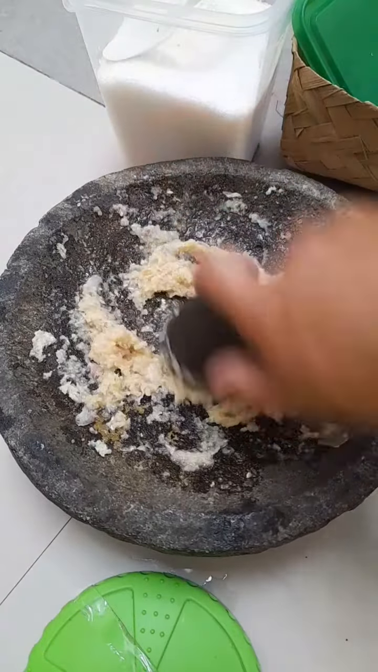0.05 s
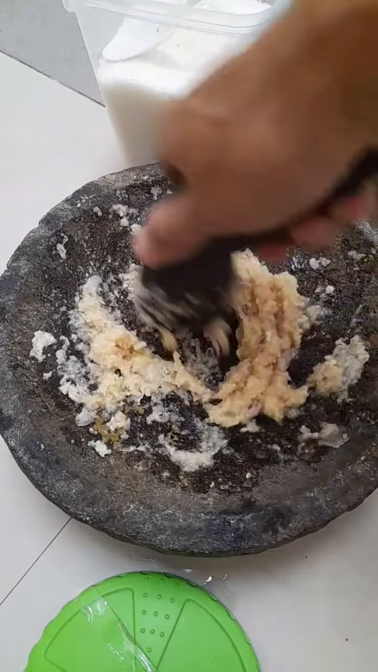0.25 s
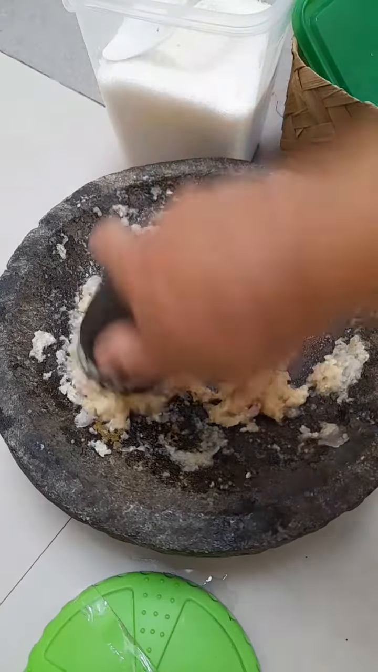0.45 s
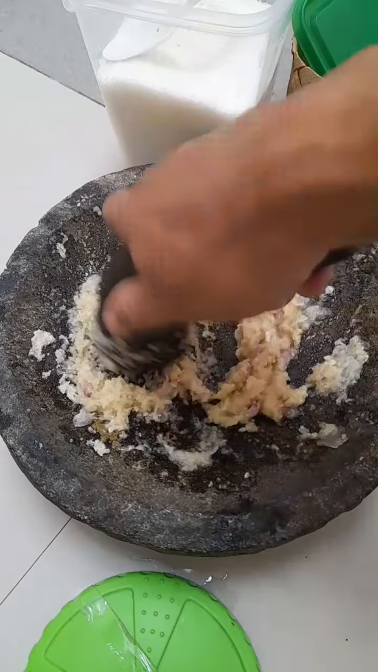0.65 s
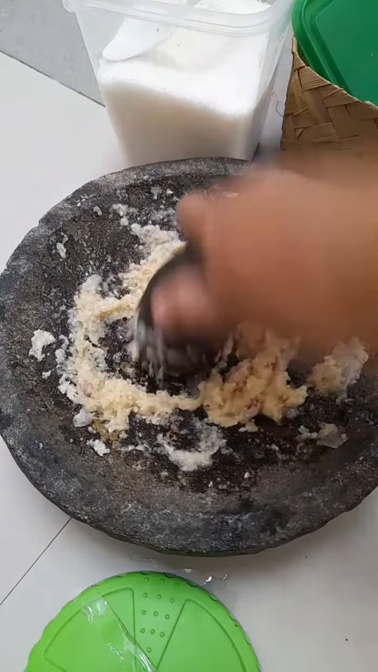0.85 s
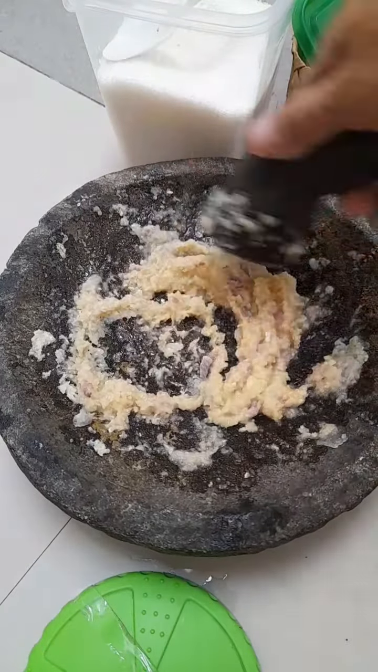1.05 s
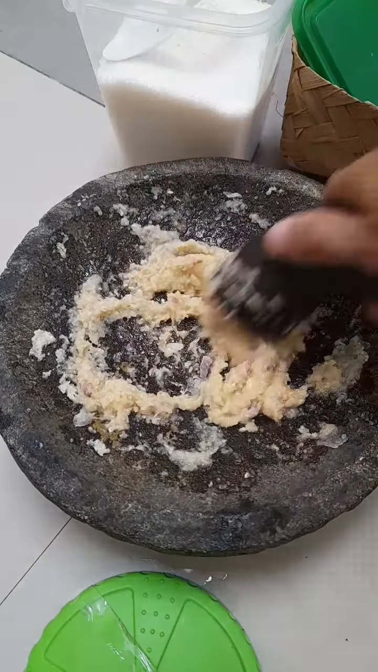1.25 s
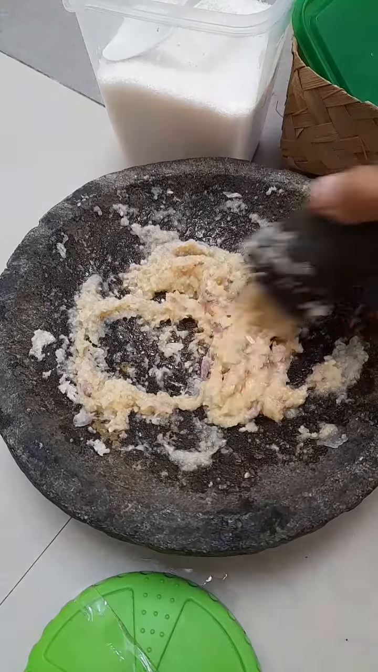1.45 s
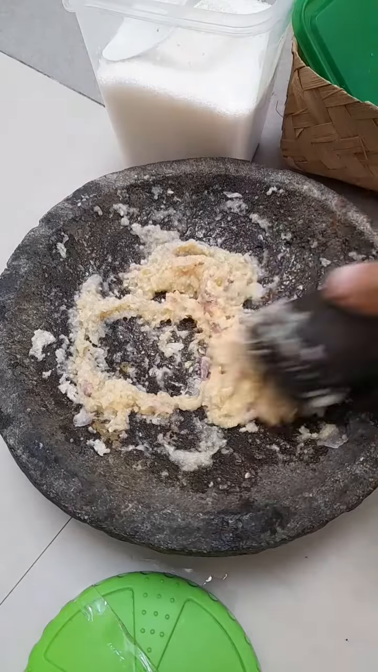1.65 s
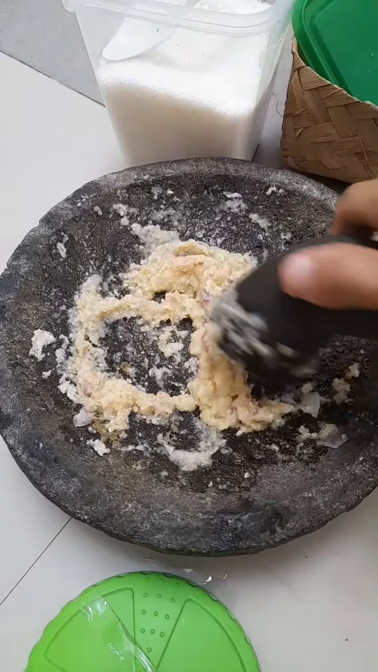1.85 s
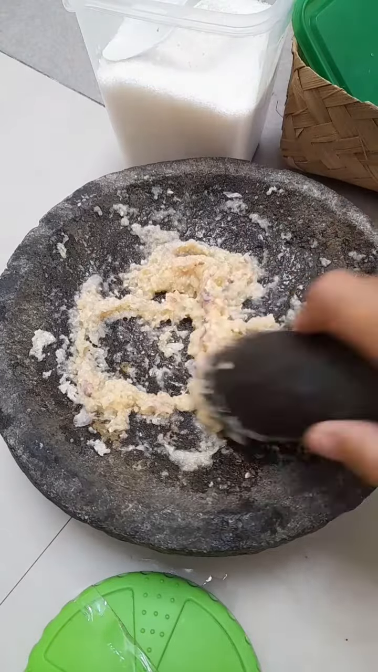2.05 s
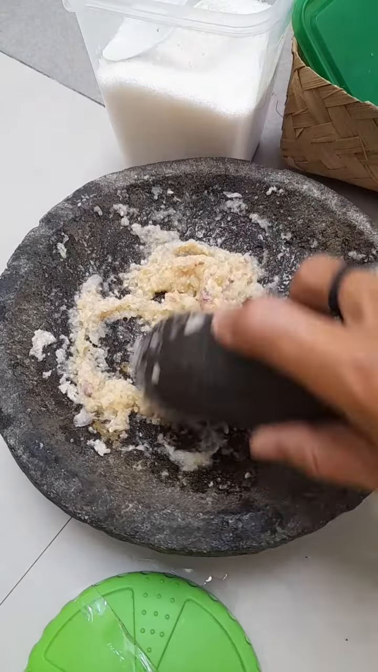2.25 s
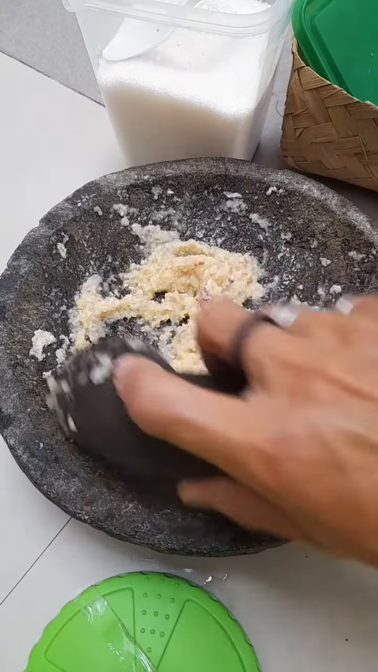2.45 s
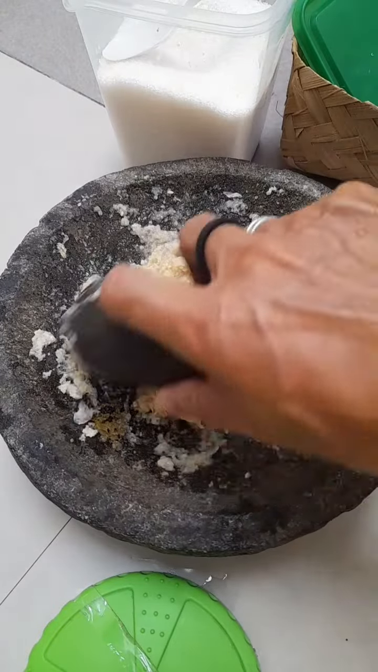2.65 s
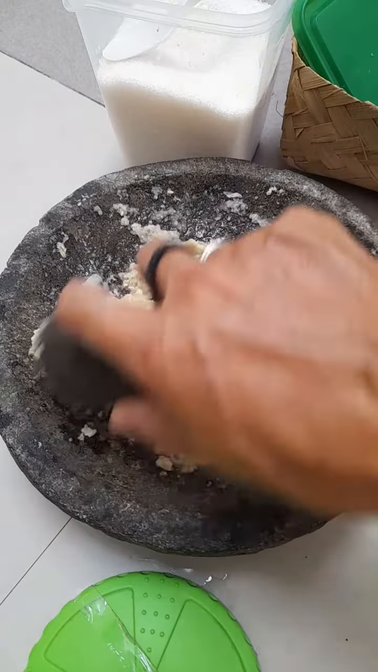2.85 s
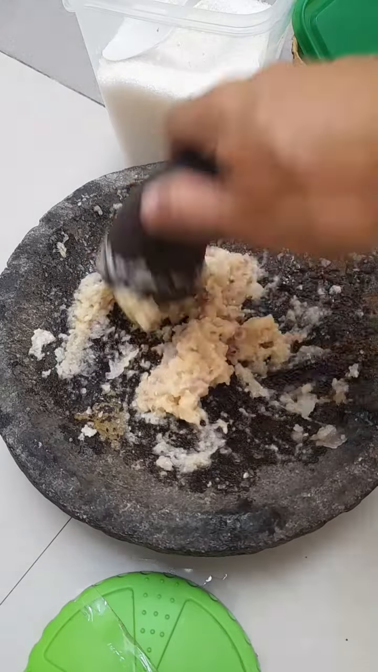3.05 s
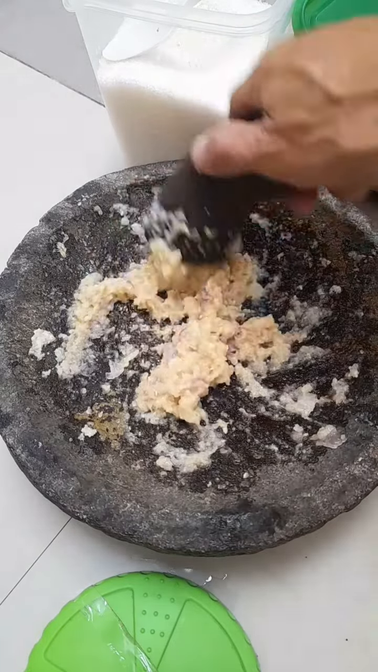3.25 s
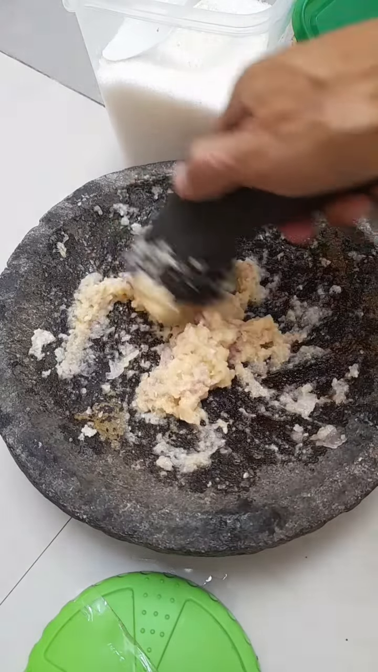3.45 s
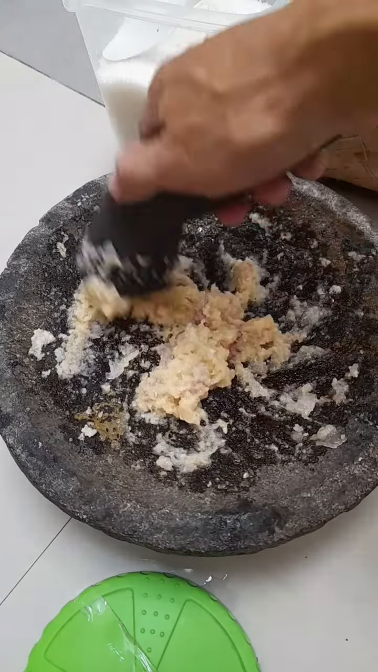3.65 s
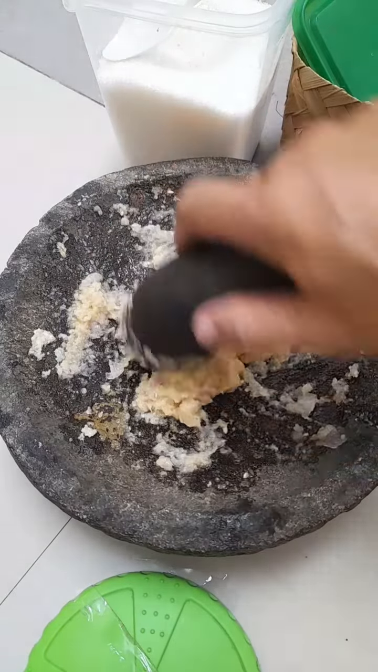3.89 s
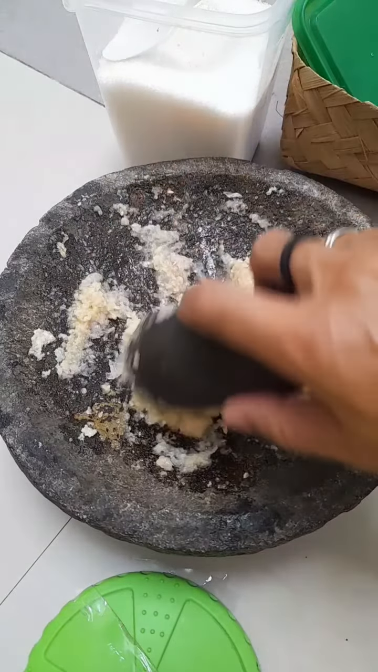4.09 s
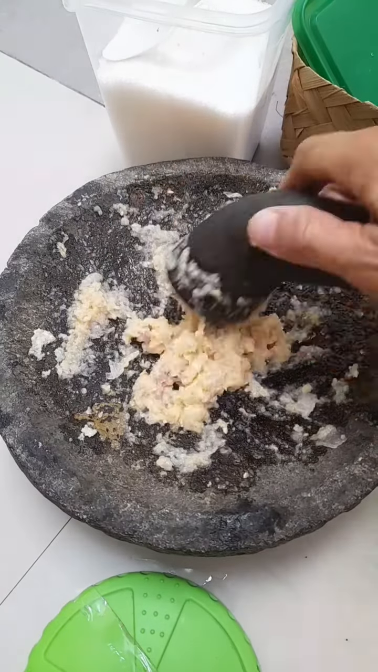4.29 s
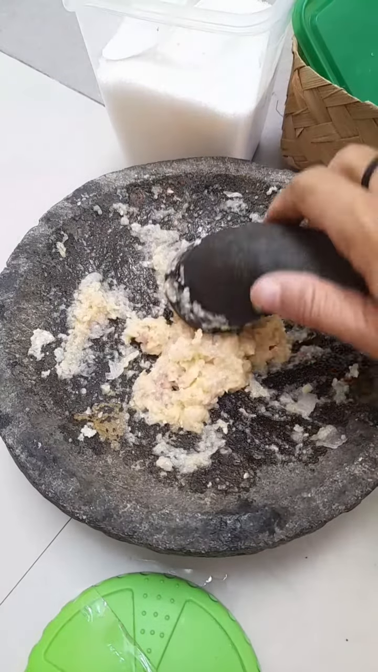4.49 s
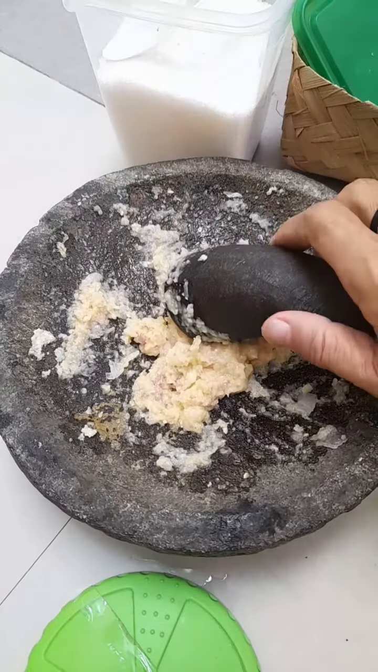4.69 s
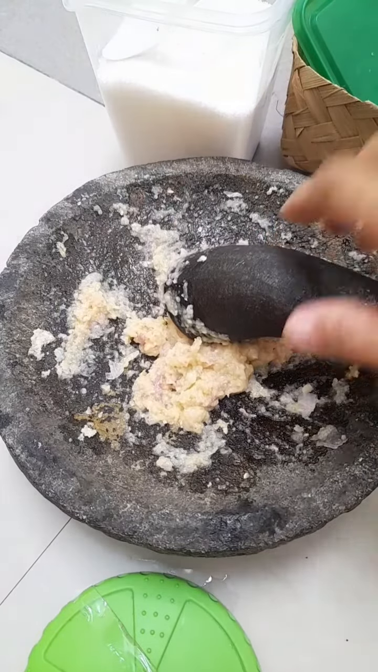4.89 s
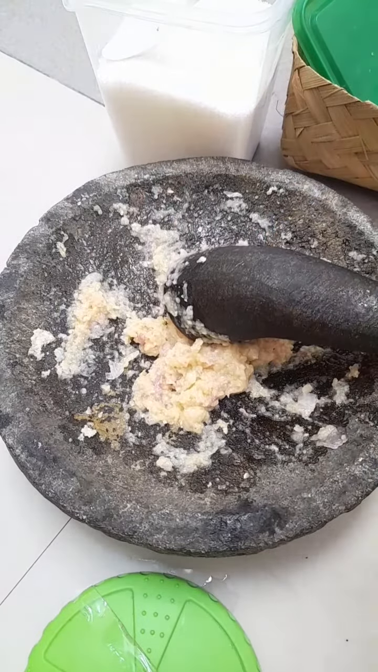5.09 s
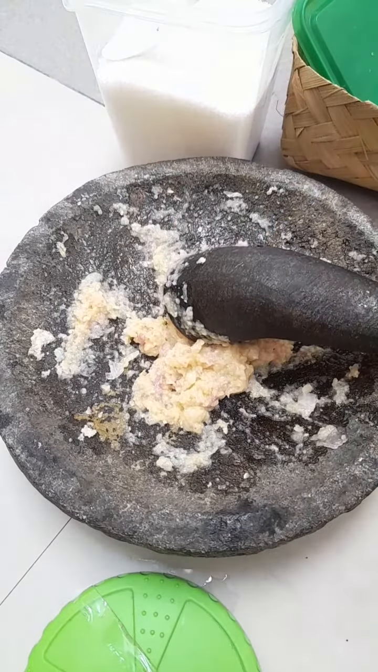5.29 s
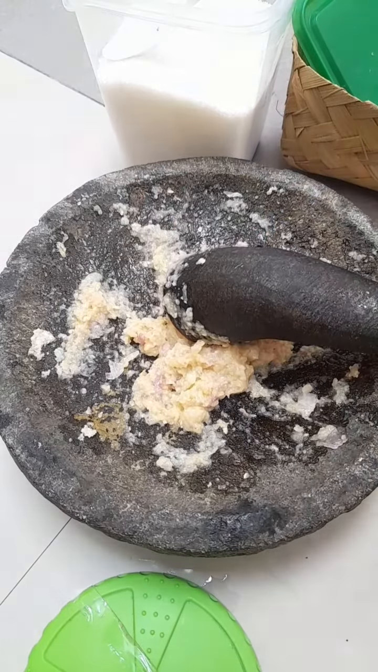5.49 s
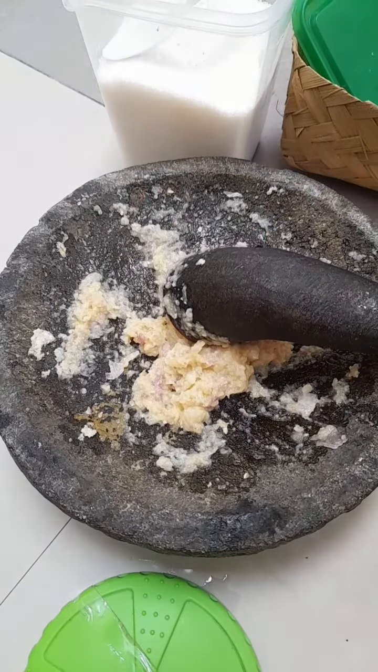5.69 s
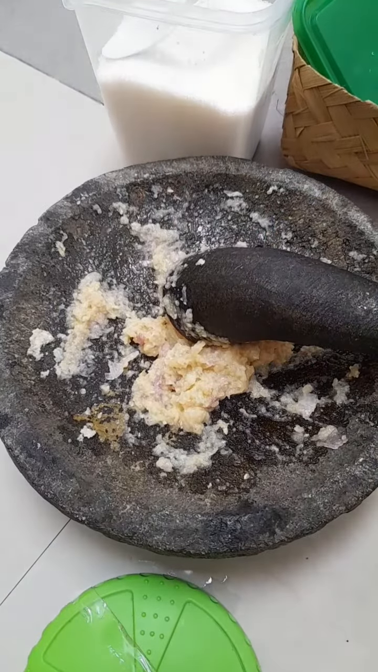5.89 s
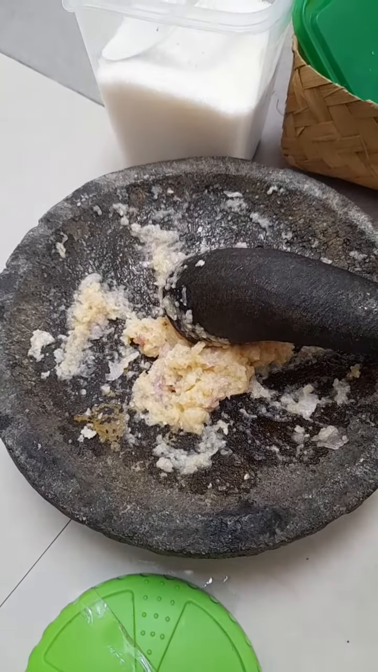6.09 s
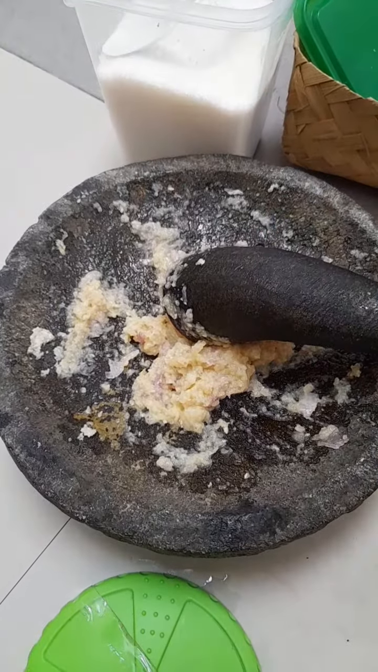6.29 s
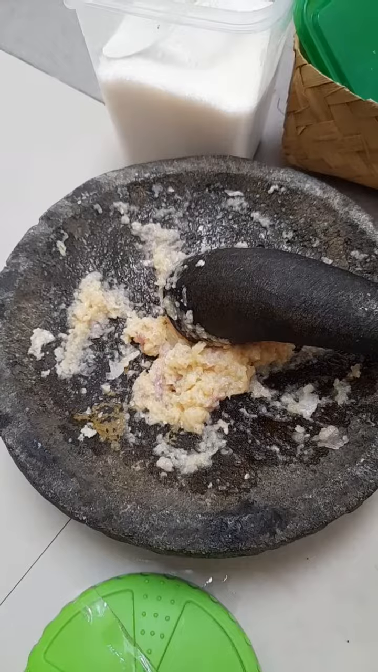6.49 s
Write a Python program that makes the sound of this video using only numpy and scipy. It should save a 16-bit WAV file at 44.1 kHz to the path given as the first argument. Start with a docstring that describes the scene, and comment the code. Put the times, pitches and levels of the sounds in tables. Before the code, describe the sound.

A close microphone in a small, hard kitchen hears a stone pestle working wet paste in a flat stone mortar, over a faint steady low rumble. From 0 to 1 second it is mostly soft: moist smears, dull gritty rubbing and a cluster of crisp sticky ticks around 0.6 to 0.9. At 1.2 a loud, bright stone clack lands with a short scrape. Around 1.55 to 1.75 come lighter rapid knocks and a rough drag. Another strong hollow knock hits at 2.0, scraping on, then medium knocks and grinding at 2.5 and 2.8. Softer taps follow near 3.3, and a broader wet, hissing smear with grit at 3.5 to 3.7. Small sticky ticks sound until 4.3. At 4.63 a sharp double clack sets the pestle down, with a brief room tail. A faint hand slide near 5 fades, leaving only quiet rumble until the end.

```python
"""A stone pestle knocks, scrapes and gathers wet spice paste in a flat stone mortar on a tiled kitchen floor.
Blows and random grit impacts excite decaying modes of the floor slab, the bowl with its rim and face, and the pestle.
The paste is shaped noise: a hiss that swells as it is smeared, and short bursts that tick as it lets go.
A hard room answers by convolution with sparse decaying taps, over a low steady rumble of filtered noise."""
import sys
import numpy as np
from scipy import signal
from scipy.io import wavfile
from scipy.ndimage import uniform_filter1d

SR = 44100
rng = np.random.default_rng(int(sys.argv[2]) if len(sys.argv) > 2 else 0)


def transcribe(signal):
    """Save signal, clipped to [-1, 1], as a 16-bit WAV file at the path in sys.argv[1]."""
    frames = np.atleast_2d(signal).T
    limited = np.clip(frames, -1, 1)
    pcm = np.round(limited * 32767).astype(np.int16)
    wavfile.write(sys.argv[1], SR, pcm)


N = 287973  # samples in the scene


def gain_of(db):
    """Decibel law: 20 dB is a factor of ten in amplitude."""
    return 10 ** (np.asarray(db) / 20)


def evened(x):
    """Normalisation by root mean square: scales the signal to rms 1."""
    return x / np.sqrt(np.mean(x ** 2) + 1e-20)


def read(points, hz):
    """Interpolation of a spectrum, linear along a log-frequency axis."""
    point_hz, value = np.transpose(points)
    return np.interp(np.log(hz + 1), np.log(point_hz + 1), value)


def sides(db):
    """Interaural level difference: half is added on the left and half taken on the right."""
    return gain_of(np.array([db / 2, -db / 2]))


SWELL_DB = 30  # level climbed in a rise time and lost in a fall time


def swells(peak_s, rise_s, hold_s, fall_s):
    """Exponential envelopes, one row each: level climbs linearly in dB, holds, then falls."""
    t = np.arange(0, N + 64, 64)[:, None] / SR  # one value per 64 samples
    before = (peak_s - t) / np.abs(rise_s)
    after = (t - peak_s - hold_s) / np.abs(fall_s)
    below = np.maximum(before, after)
    return gain_of(-SWELL_DB * np.maximum(below, 0)).T


def summed(gains, db):
    """Incoherent addition: swells add by power at their levels, then spread over all samples."""
    power = gain_of(2 * np.asarray(db)) @ gains ** 2
    total = np.sqrt(power)
    return np.interp(np.arange(N), np.arange(len(total)) * 64, total)


def hiss(shape, same, lead, size):
    """Random-phase synthesis: two partly coherent channels of noise with magnitude shape(Hz, s)."""
    hop = size // 4
    frames, hz = N // hop + 5, np.fft.rfftfreq(size, 1 / SR)
    a, b, c, d = rng.standard_normal((frames, len(hz), 4)).T
    likeness = np.clip(read(same, hz), -1, 1)[:, None]
    lag = np.exp(-1j * read(lead, hz))[:, None]
    left = a + 1j * b
    right = likeness * left * lag + np.sqrt(1 - likeness ** 2) * (c + 1j * d)
    spectra = np.array([left, right]) * shape(hz[:, None], np.arange(frames) * hop / SR)
    return signal.istft(spectra, nperseg=size, noverlap=size - hop)[1][:, :N]


# Rumble colour. Each row: frequency in Hz, relative level in dB per Hz.
RUMBLE_COLOUR = [(21, -48.5), (35, -13), (82, -10), (129, -9), (171, -10), (239, -18), (258, -22.5),
                 (309, -23), (389, -27.5), (800, -50), (1300, -58), (6690, -64), (10600, -61),
                 (14500, -64.5), (16000, -71.5)]
# Rumble coherence. Each row: frequency in Hz, left-right likeness from -1 to 1.
RUMBLE_LIKENESS = [(60, 1), (200, 0.98), (330, 0.5), (550, -0.01), (1650, 0.63), (4970, 0.072),
                   (15000, 0.3)]
# Rumble balance. Each row: frequency in Hz, left-right level difference in dB.
RUMBLE_LEAN = [(60, -0.1), (240, -4), (950, -0.5), (3770, -2), (15000, -1.5)]
RUMBLE_DB = -44  # rms level


def rumble():
    """Stationary coloured noise: low sound from outside the room, in drifting patches."""
    def shape(hz, t):
        """Slow modulation: patches smoothed over frequency and time wander about the colour."""
        patches = rng.standard_normal((len(t), len(hz))).T
        patches = uniform_filter1d(patches, 3, 0)
        patches = evened(uniform_filter1d(patches, 8, 1))
        lean = sides(read(RUMBLE_LEAN, hz))
        return lean * gain_of(read(RUMBLE_COLOUR, hz) + 0.5 * patches)

    noise = hiss(shape, RUMBLE_LIKENESS, [(60, 0), (15000, 0.02)], size=2048)
    return gain_of(RUMBLE_DB) * evened(noise)


# Sticky paste letting go. Each row: time in seconds, peak level in dB, centre in Hz.
TICKS = [(0.034, -40.5, 7000), (0.048, -46, 7000), (0.163, -44, 3860), (0.188, -37, 8700),
         (0.2726, -43.5, 6800), (0.312, -56, 10100), (0.526, -58, 4600), (0.6316, -29, 7440),
         (0.6455, -31.5, 3600), (0.744, -28, 4500), (0.75, -32, 13300), (0.7888, -38, 7590),
         (0.8454, -38.5, 5650), (0.856, -34, 12500), (0.8813, -36, 12710), (0.9082, -27.5, 4750),
         (0.936, -34.5, 12300), (1.33, -41, 7000), (1.385, -42, 8700), (1.494, -47, 9180),
         (2.1206, -41.5, 3670), (2.2328, -39.5, 11600), (2.2668, -39.5, 13000), (2.6445, -36.5, 12700),
         (2.6834, -43.5, 11100), (3.033, -38.5, 11170), (3.3947, -38, 6950), (3.729, -32.5, 4770),
         (3.8204, -41, 9190), (3.8508, -38, 4850), (4.0044, -51.5, 10700), (4.1445, -50.5, 14300),
         (4.1685, -44.5, 7200), (4.1941, -31.5, 4430), (4.219, -50, 1650), (4.232, -41, 4640),
         (4.2786, -47.5, 14300), (4.289, -48.5, 1750)]
# Paste squeezed and smeared, then the hand sliding off the stone. Each row: peak time in seconds,
# rise in seconds, hold in seconds, fall in seconds, level in dB, treble tilt in dB per octave.
SMEARS = [(0.114, 0.69, .003, 0.02, -51.5, -7.5), (0.184, 0.17, .003, .16, -52.5, -3.5),
          (0.27, 0.044, .003, .22, -69.5, -1), (0.46, 0.015, .15, 0.11, -63.5, -3),
          (0.65, .05, .07, 0.085, -52, -1), (0.746, .06, .003, 0.12, -44, -2.5),
          (0.856, .06, .003, .165, -45, -1.5), (1.19, 0.041, .22, 0.147, -57, -3.5),
          (1.546, 0.026, .06, 0.19, -54.5, -6.5), (1.652, 0.16, .04, .22, -50.5, -2),
          (2.01, .008, .1, .1, -65.5, -1.6), (2.12, .012, .003, 0.32, -51.5, 0.5),
          (2.232, .008, .003, .2, -53, -6.5), (2.56, 0.38, .003, 0.22, -53.5, -4),
          (2.644, 0.008, .003, .04, -52.5, 0.5), (2.81, 0.0086, .003, .11, -57, -1.5),
          (2.946, 0.17, .003, 0.15, -52.5, -2), (3.036, .05, .003, .015, -50, -0.5),
          (3.05, .012, .003, 0.063, -61, -1.4), (3.244, .009, .14, .05, -59, -3),
          (3.43, .07, .04, .1, -50.5, -4.5), (3.566, 0.25, 0.074, 0.18, -36.5, -3.5),
          (3.82, .015, .06, .3, -60, -5), (4.192, .03, .003, 0.27, -54.5, -6.5),
          (4.462, 0.095, .003, .3, -67.5, -3.4), (4.7, .03, .18, .1, -69.5, -7.5),
          (4.986, 0.31, .02, .16, -58, -6), (5.342, .13, .003, .25, -69.5, 6.5)]
# Paste hiss colour. Each row: frequency in Hz, relative level in dB per Hz.
SMEAR_COLOUR = [(900, -36), (1600, -10.5), (3000, -9.5), (4500, -6.5), (7000, -4.5), (10000, -8),
                (13000, -1), (15500, -6.5)]
# Paste hiss coherence. Each row: frequency in Hz, left-right likeness from -1 to 1.
SMEAR_LIKENESS = [(1000, 1), (5000, 0.88), (15000, 1)]
# Paste hiss phase. Each row: frequency in Hz, radians by which the left leads.
SMEAR_LEAD = [(1000, 2), (8000, 1.69), (15000, 0.8)]
SQUELCH_DB, SQUELCH_S = -11.5, 0.03  # the hiss jumps after each tick, against its peak, and falls


def smear():
    """Modulated broadband noise: a dense wet hiss whose tilt is the power-weighted mean of its swells."""
    peak_s, rise_s, hold_s, fall_s, db, tilt_db = np.transpose(SMEARS)
    squeeze = swells(peak_s, rise_s, hold_s, fall_s)
    power = (gain_of(db)[:, None] * squeeze) ** 2 + 1e-30
    tilt_now = tilt_db @ power / power.sum(0)
    tick_s, tick_db, _ = np.transpose(TICKS)
    squelch = swells(tick_s, 0.0018, 0, SQUELCH_S)
    level = np.hypot(summed(squeeze, db), summed(squelch, tick_db + SQUELCH_DB))

    def shape(hz, t):
        """Spectral tilt about 8 kHz, with a flicker in level common to all frequencies."""
        flicker = evened(uniform_filter1d(rng.standard_normal(len(t)), 4))
        octaves = np.clip(np.log2((hz + 1) / 8000), -2.5, 1)
        tilt = np.interp(t, np.linspace(0, N / SR, len(tilt_now)), tilt_now) * octaves
        return gain_of(read(SMEAR_COLOUR, hz) + tilt + 0.84 * flicker)

    return level * evened(hiss(shape, SMEAR_LIKENESS, SMEAR_LEAD, size=256))


# Modes of the five ringing bodies. Each row: frequency in Hz, relative level in dB, t60 in seconds
# before the share of ring time, left-right difference in dB, radians by which the left leads.
BOWL = [(604, -6, 0.0057, 0.67, 0.42), (617.7, 9.5, 0.025, 0.67, 0.62), (662, 4, 0.024, 1.5, 1.1),
        (717.6, 6, 0.028, 2, 0.66), (809, -7, 0.11, 0.73, 2.4), (959.5, -3.5, .05, 18, 0.94),
        (1016, -6.5, 0.059, 3.8, 1)]
PESTLE = [(2012, -7.5, 0.018, -13.5, 0.2), (2175, 5.5, 0.028, -1, 1.4), (2398, -39.5, 0.21, 12.5, 1.3),
          (2500, -9, 0.017, 2.5, 2.8), (2653, -22.5, 0.013, 0, 1.5)]
FACE = [(2910, -0.5, 0.03, 1, 2.1), (3760, -0.5, 0.036, 0.91, 0.94), (4458, 4, 0.032, 0.69, 1.3),
        (4603, -8.5, 0.099, 0.54, 1.2), (4980, 1, 0.042, 0.85, 1.9), (6880, -11.5, 0.04, 0.47, 1.1),
        (3360, -1.5, .01, 0.7, 1.7), (4900, -10, 0.013, 0.7, 4.3), (6200, -17.5, 0.011, 0.7, 1.3),
        (7550, -20, 0.013, 0.7, 1.4), (9430, -12, 0.028, 0.7, 1.2)]
RIM = [(1178, 3, 0.019, 2, 1.8), (1334, 4.5, 0.012, 2.5, 1.6), (1650, -5, 0.01, 2.5, 4),
       (1737, -1, 0.021, 3.3, 1.5)]
SLAB = [(124.5, -16, 0.16, 5.5, 0.12), (157.5, -5, 0.23, 1, .2), (254, 2, 0.054, 2.5, 0.19),
        (305, 4, 0.061, -4.5, 1)]
BODIES = [(BOWL, 0.0012), (PESTLE, 0.0009), (FACE, 0.0004), (RIM, 0.0008), (SLAB, 0.002)]  # contact rise in s
PRESSED, FREE = 0.74, 0.93  # share of ring time left: stones pressed together in paste, and after a blow


def ring(modes, rise_s, share):
    """Modal superposition: a struck body sounds as a sum of decaying sines, two channels, peak 1."""
    t = np.arange(SR // 6) / SR
    out = np.zeros((2, len(t)))
    for hz, db, t60, pan_db, lead in modes:
        decay = gain_of(db - 60 * t / (t60 * share))
        phase = np.array([[lead / 2], [-lead / 2]])
        out += sides(pan_db)[:, None] * decay * np.sin(2 * np.pi * hz * t + phase)
    out = out * (1 - np.exp(-t / rise_s))  # the contact takes a moment to build
    return out / abs(out.mean(0)).max()


# Scrapes of stone on stone. Each row: peak time in seconds, rise in seconds, hold in seconds, fall in
# seconds, grit into the bowl in dB, into the pestle in dB, rasp of the face in dB, into the rim in dB.
SCRAPES = [(0.077, 0.12, 0.045, 0.047, -49, -62.5, -63.5, -58),
           (0.159, 0.037, 0.06, 0.035, -53, -70, -62.5, -60), (0.48, .04, 0.009, 0.18, -66, -73, -85, -74),
           (0.541, .015, 0.037, 0.18, -54, -58.5, -69, -63),
           (0.623, 0.08, 0.065, 0.065, -45.5, -58.5, -58.5, -54),
           (0.726, 0.054, 0.044, 0.12, -47, -62.5, -61, -57),
           (0.852, 0.05, 0.051, 0.02, -51, -69, -60.5, -65),
           (1.204, 0.013, 0.052, 0.16, -33, -33, -57.5, -40),
           (1.547, 0.011, 0.14, .1, -44, -46.5, -58, -60),
           (1.669, .03, 0.046, 0.054, -34.5, -47.5, -61, -50),
           (2.039, 0.026, 0.017, 0.077, -37.5, -28, -73, -33.5),
           (2.086, .03, 0.091, .11, -42, -43, -67, -49),
           (2.424, 0.049, 0.022, 0.25, -35.5, -50.5, -63.5, -58),
           (2.541, 0.09, 0.038, 0.045, -35.5, -50, -58.5, -47.5),
           (2.826, 0.01, 0.0084, 0.028, -41, -66, -76, -55.5),
           (2.86, 0.038, 0.099, 0.077, -51, -57.5, -61.5, -63),
           (3.251, .012, .01, .1, -56.5, -65.5, -66.5, -66),
           (3.306, 0.011, 0.042, 0.047, -42.5, -50.5, -57, -43),
           (3.543, 0.11, 0.079, .05, -47.5, -52.5, -50.5, -52),
           (3.643, 0.036, 0.077, 0.066, -42.5, -48.5, -55.5, -51.5),
           (4.191, 0.015, 0.037, 0.14, -74, -70.5, -73, -71)]
SLIP_DB = 3.0  # spread of the grit level as the stone sticks and slips
SLAB_GRIT_DB = -0.5  # floor share of the grit, against the bowl


def scrapes():
    """Stick-slip friction: a rain of random grit impacts drives the five damped bodies."""
    out = np.zeros((2, N))
    sizes = gain_of(3.1 * np.minimum(rng.exponential(1, N), 4))
    impacts = sizes * (rng.random(N) < 2600 / SR)  # about 2600 a second
    slips = uniform_filter1d(rng.standard_normal(N), 250)
    slips = evened(uniform_filter1d(slips, 250))  # the stone sticks and lets go
    grit = evened(impacts * gain_of(SLIP_DB * slips) * rng.choice([-1., 1.], N))
    peak_s, rise_s, hold_s, fall_s, bowl_db, pestle_db, rasp_db, rim_db = np.transpose(SCRAPES)
    pressure = swells(peak_s, rise_s, hold_s, fall_s)
    levels = [bowl_db, pestle_db, rasp_db, rim_db, bowl_db + SLAB_GRIT_DB]
    for (modes, contact_s), db in zip(BODIES, levels):
        damped = ring(modes, contact_s, PRESSED)
        damped = damped / np.linalg.norm(damped.mean(0))
        force = summed(pressure, db) * grit
        out += signal.oaconvolve(force[None], damped, axes=1)[:, :N]
    return out


def ticks():
    """Transient release: each tick is a wide noise burst tinted at its centre, gone in milliseconds."""
    out, t = np.zeros((2, N + 600)), np.arange(600) / SR
    noises = rng.standard_normal((len(TICKS), 3, len(t)))
    for (s, db, hz), noise in zip(TICKS, noises):
        envelope = (1 - np.exp(-t / 0.00037)) * np.exp(-t / 0.0015)
        burst = (noise[0] + 6.9 * noise[1:]) * envelope  # a little shared, mostly separate per side
        tint = signal.butter(2, [hz * 0.589, min(hz * 1.2, SR * 0.45)], "bandpass", fs=SR)
        burst = signal.lfilter(*tint, burst) + 0.54 * burst * (hz / 8000)
        at = round(s * SR)
        out[:, at:at + len(t)] += gain_of(db) * burst / abs(burst.mean(0)).max()
    return out[:, :N]


# Blows of the pestle. Each row: time in seconds, bowl level in dB, pestle level in dB, rim level in dB,
# thud of the floor slab in dB.
BLOWS = [(0.079, -39.5, -65, -60, -36.5), (0.165, -41.5, -59, -61, -50), (0.548, -36.5, -45, -54, -37),
         (1.169, -11.5, -5.5, -11, -14), (1.193, -21, -23, -19.5, -32), (1.539, -55, -34.5, -43, -52),
         (1.569, -25, -48, -63, -38), (1.615, -40, -43, -50, -30), (1.676, -24.5, -42, -60, -46),
         (1.703, -25, -44, -48, -45), (1.716, -25.5, -43.5, -51, -43), (1.728, -27.5, -45, -50, -42),
         (2.003, -5.5, -10, -32, -20.5), (2.025, -29, -41, -16.5, -40), (2.098, -16.5, -50, -25.5, -54),
         (2.522, -19.5, -47, -34, -52), (2.531, -16, -46, -38, -30), (2.577, -24, -49.5, -43.5, -38),
         (2.818, -18, -44, -40, -28), (2.874, -47.5, -59.5, -45, -34.5), (3.249, -43, -41.5, -40, -28.5),
         (3.312, -23.5, -54, -28, -30), (3.344, -26.5, -45.5, -56, -34.5), (3.622, -37, -26.5, -24, -22.5),
         (4.628, -11, -5, -16, -21), (4.656, -14.5, -46, -14, -30.5)]
CLACK_DB, CLACK_FOLLOWS = -25, 0.7  # face clack: dB at full force, dB per dB of the louder of pestle and rim
CLACK_RIM_DB = -9.5  # a rim blow clacks less than a pestle blow


def blows():
    """Impulse excitation: each blow is a single force pulse that sets the five bodies ringing."""
    out = np.zeros((2, N))
    s, bowl, pestle, rim, thud = np.transpose(BLOWS)
    clack = CLACK_DB + CLACK_FOLLOWS * np.maximum(pestle, rim + CLACK_RIM_DB)
    for (modes, contact_s), db in zip(BODIES, [bowl, pestle, clack, rim, thud]):
        force = np.zeros(N)
        force[np.round(s * SR).astype(int)] = gain_of(db)
        out += signal.oaconvolve(force[None], ring(modes, contact_s, FREE), axes=1)[:, :N]
    return out


# Reverberation of the room. Each row: frequency in Hz, t60 in seconds.
KITCHEN_DECAY = [(150, 0.65), (500, 0.37), (1100, 0.41), (2500, 0.48), (7000, 0.6)]
FIRST_WALL_S = 0.0089  # taps before the first wall are weaker


def kitchen(x):
    """Reverberation by convolution: sparse taps of random sign, each band dying at its own speed."""
    out, length = np.zeros((2, N)), round(0.6 * SR)
    for k in range(3):  # the stone moves about, so three tails take turns
        taps = np.zeros((2, length))
        jitter = rng.integers(0, 20, (2, (length - 101) // 20))
        at = np.arange(100, length - 20, 20) + jitter
        np.put_along_axis(taps, at, rng.choice([-1., 1.], at.shape), 1)
        taps = taps + 0.43 * taps[::-1]  # each side hears some of the other
        taps = taps * (0.3 + 0.7 * (np.arange(length) / SR > FIRST_WALL_S))
        hz, t, z = signal.stft(taps, SR, nperseg=256)
        decay = gain_of(-60 * t / read(KITCHEN_DECAY, hz)[:, None])
        tail = signal.istft(z * decay, SR, nperseg=256)[1]
        turn = np.sqrt(2 / 3) * np.cos(np.pi * (7 * np.arange(N) / SR + k / 3))
        out += signal.fftconvolve(x * turn, tail / np.linalg.norm(tail[0]), axes=1)[:, :N]
    return out


KITCHEN_STONE_DB, KITCHEN_PASTE_DB = -4.5, -15  # levels sent into the room


def scene():
    """Superposition: stone and paste, their reverberation, and the rumble add together."""
    background = rumble()
    paste = smear() + ticks()
    stone = scrapes() + blows()
    sent = gain_of(KITCHEN_STONE_DB) * stone + gain_of(KITCHEN_PASTE_DB) * paste
    return stone + paste + kitchen(sent) + background


EDGE_HZ = 16000  # upper band limit


def record(dry):
    """Band limitation: the microphone drops the deepest bass, peaks clip at full scale, then a low-pass."""
    bass_cut = signal.butter(5, 46, "highpass", fs=SR, output="sos")
    thin = signal.sosfilt(bass_cut, dry)
    held = np.pad(np.clip(thin, -1, 1), ((0, 0), (127, 127)), "edge")
    low_pass = signal.firwin(255, EDGE_HZ, window=("kaiser", 9), fs=SR)
    return signal.oaconvolve(held, low_pass[None], "valid", axes=1)


dry = scene()
out = record(dry)
transcribe(out)
```